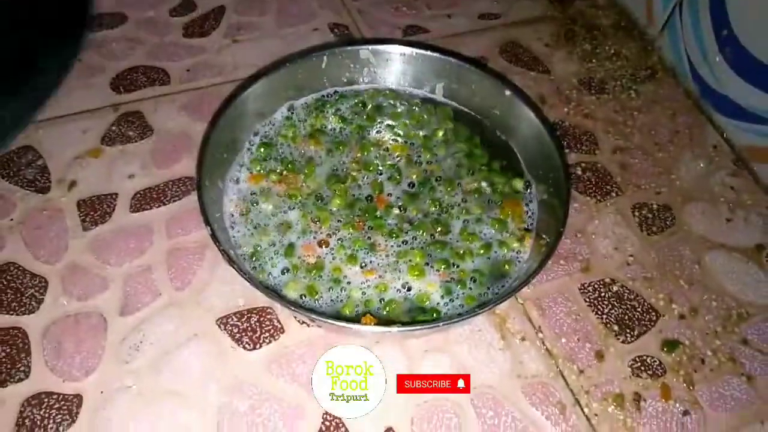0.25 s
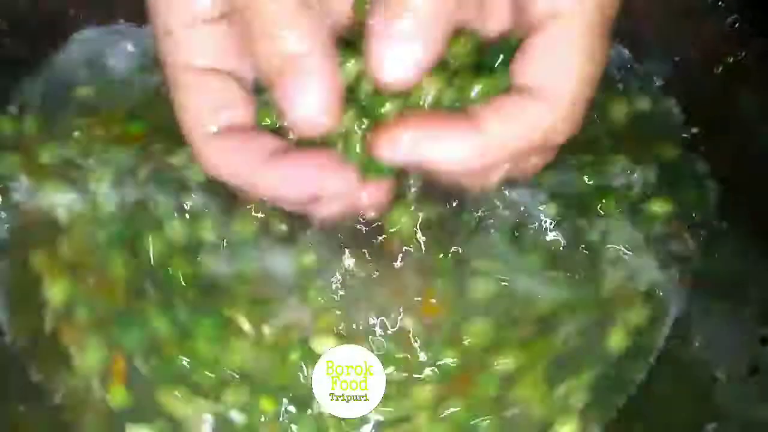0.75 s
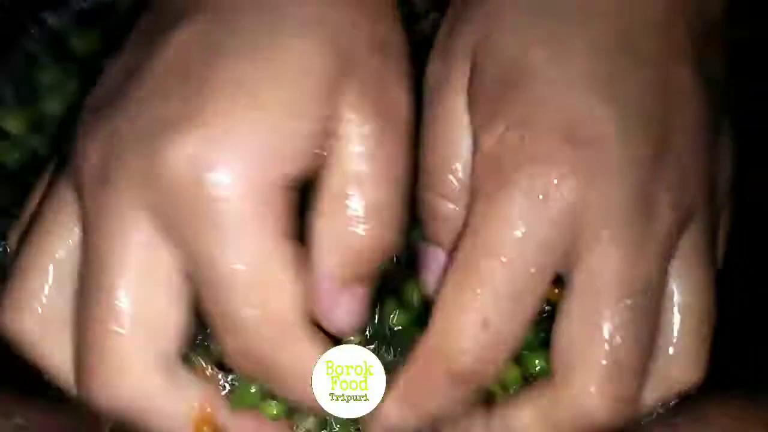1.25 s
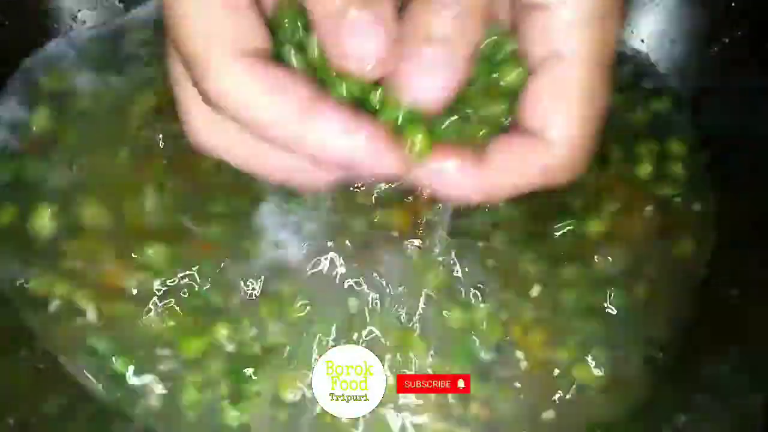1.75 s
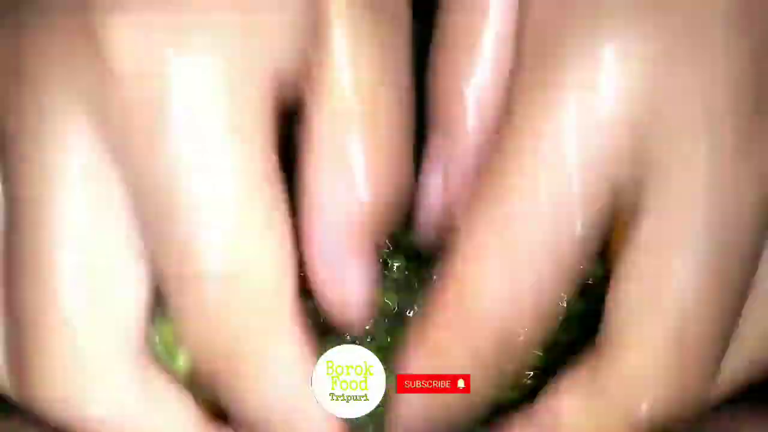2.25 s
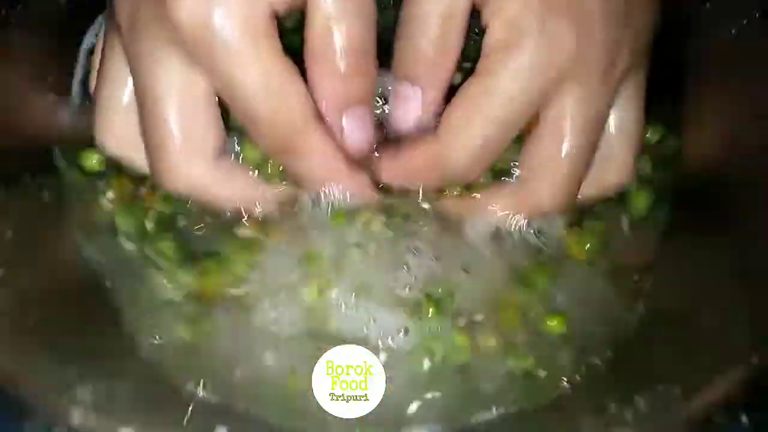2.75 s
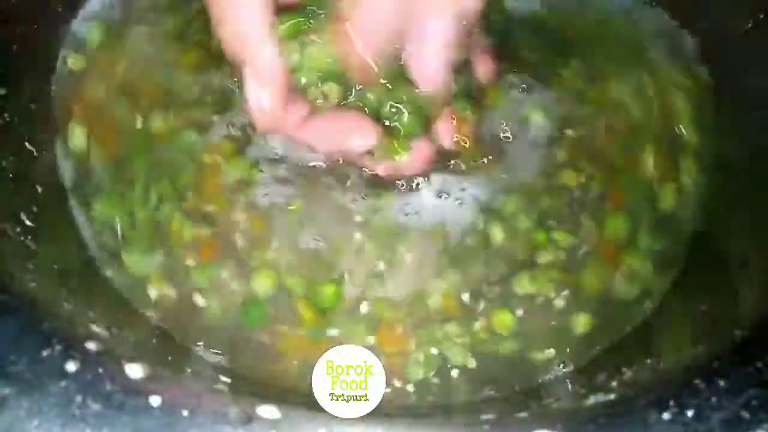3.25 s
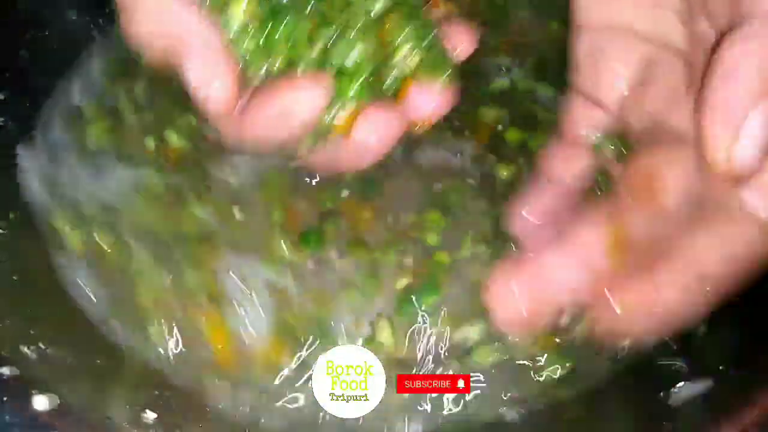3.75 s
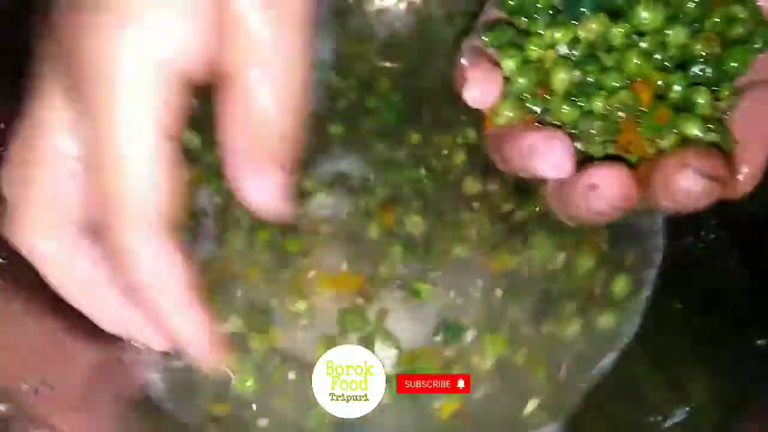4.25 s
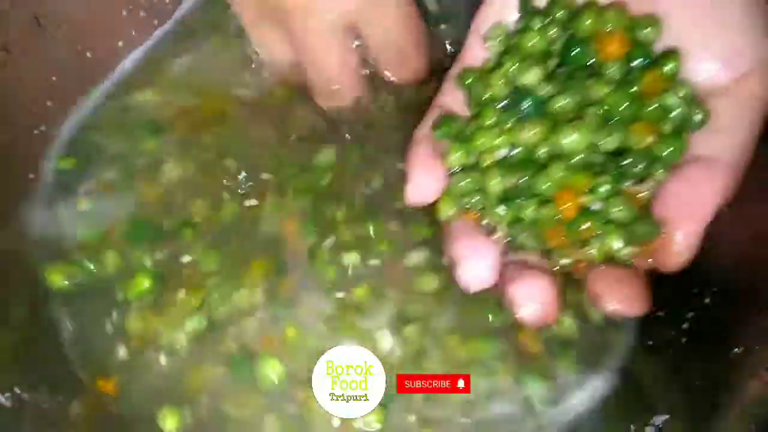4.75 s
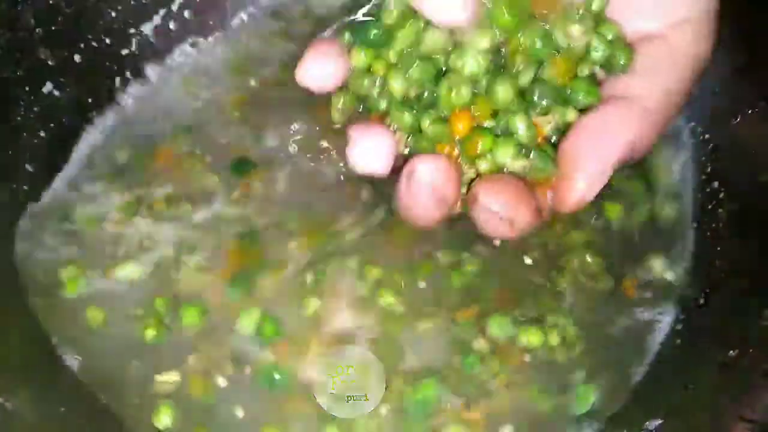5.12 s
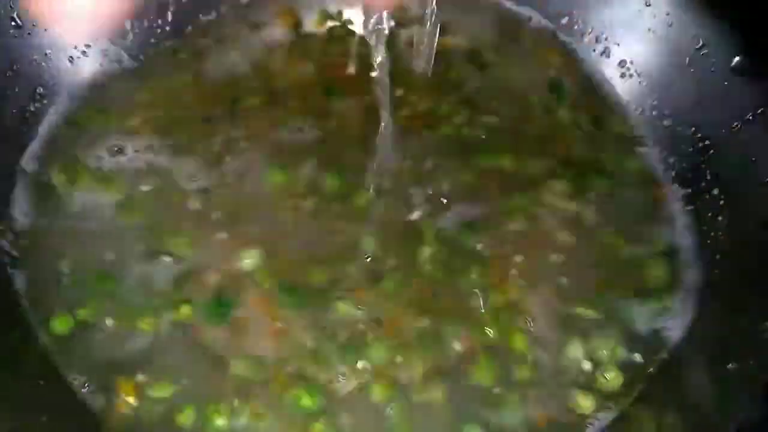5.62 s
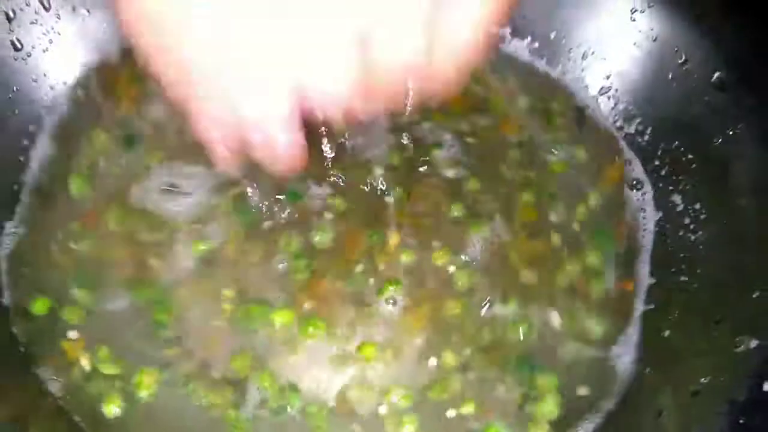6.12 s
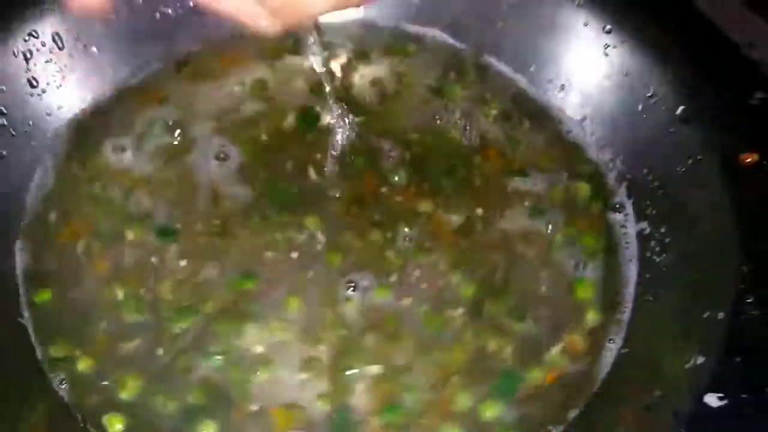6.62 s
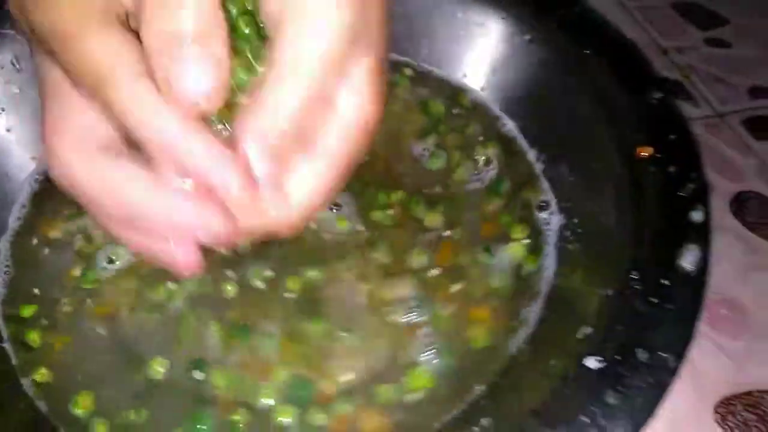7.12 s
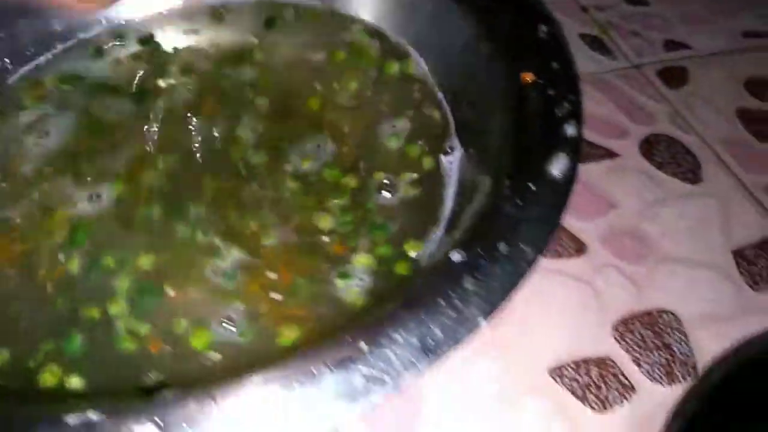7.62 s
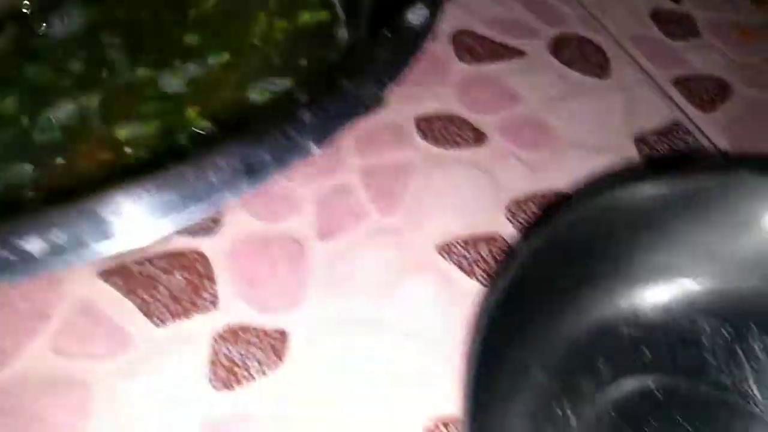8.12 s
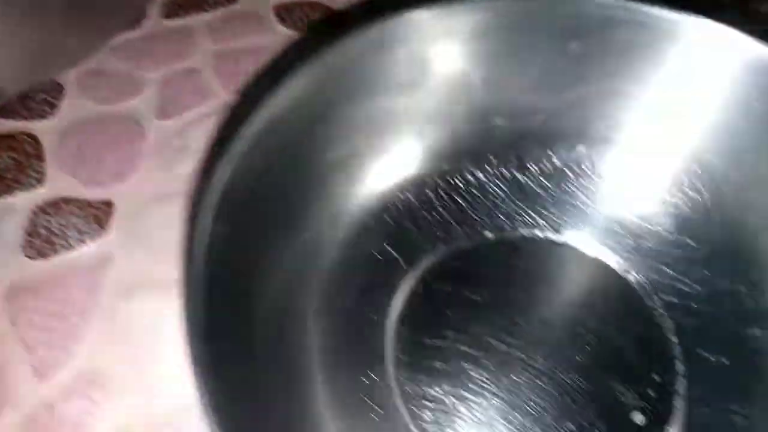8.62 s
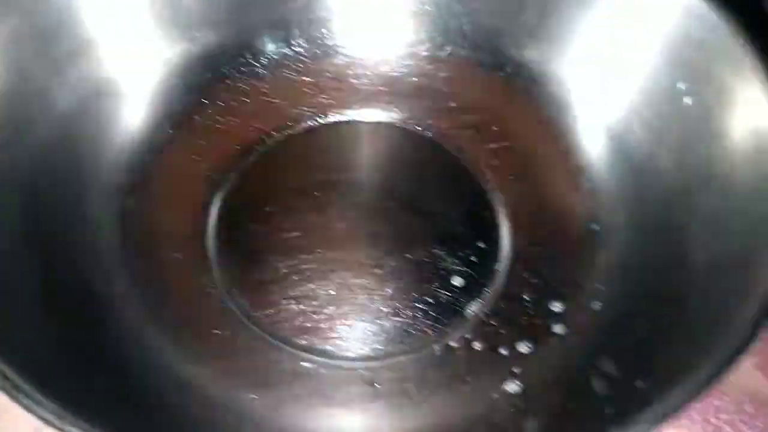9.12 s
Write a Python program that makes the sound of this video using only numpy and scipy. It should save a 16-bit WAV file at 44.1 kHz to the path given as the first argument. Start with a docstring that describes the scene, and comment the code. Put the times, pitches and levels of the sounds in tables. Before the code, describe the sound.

A low wavering hum and faint hiss open with tiny drops and a very brief dropout. Hands then rinse small berries in a steel basin: two fuller gurgling splashes, scattered plinks and drips, two weaker dribbles, and a busy cluster of bright drops. One sharp plop follows, then mostly quiet hum with faint ticks and two tiny distant bird calls. Close phone microphone, small hard kitchen.

```python
"""A low, wavering drone and soft hiss come first, with small drops of water; the sound cuts out briefly near 0.4 s.
Then hands rinse small berries in a steel basin: two long splashes, two weaker ones, and many single drops.
Water is made of short ringing bubbles; drone, hiss and two far bird calls are shaped noise and slow tones.
The steel and the hard kitchen walls ring on. A phone's noise suppressor turns down what stays near the hiss,
and one edit leaves the gap."""
import sys
import numpy as np
from scipy import signal
from scipy.fft import rfft, irfft, next_fast_len
from scipy.io import wavfile
from scipy.ndimage import uniform_filter1d, minimum_filter1d

SR = 44100
rng = np.random.default_rng(int(sys.argv[2]) if len(sys.argv) > 2 else 0)


def to_wav(s):
    """Save 16-bit WAV."""
    ch = np.atleast_2d(s).T  # columns
    pcm = np.round(np.clip(ch, -1, 1) * 32767)  # PCM
    wavfile.write(sys.argv[1], SR, pcm.astype(np.int16))


N = 413658

# Drone levels over time: t/s, lower hum level/dB, upper hum level/dB, rumble level/dB
DRONE_LEVELS = [(0.0, -42, -56, -72), (0.05, -48.5, -83, -62), (0.1, -59.5, -65, -61),
                (0.47, -59.5, -63, -61), (0.6, -49.5, -50.5, -52), (1.07, -65, -68, -58),
                (1.15, -49.5, -47, -50.5), (1.28, -44.5, -61, -53.5), (1.36, -68, -77, -50),
                (1.46, -56, -44, -49.5), (1.62, -51, -67.5, -58), (1.98, -77, -57.5, -63),
                (2.32, -62.5, -69, -56.5), (3.03, -66, -55.5, -59.5), (3.24, -61, -82, -58.5),
                (3.76, -67.5, -59.5, -64), (4.23, -63, -75, -54.5), (4.52, -65.5, -63, -61),
                (5.85, -53, -68.5, -57), (6.03, -48, -61, -52), (6.32, -61, -65, -57), (6.5, -46, -58, -52),
                (7.55, -67.5, -55.5, -54), (8.02, -54.5, -64, -54.5), (8.12, -64.5, -55, -55),
                (9.04, -71.5, -61.5, -56.5), (9.3, -61, -61, -53.5), (9.38, -78, -64, -62)]
# Colour of the noise around the deep hums: f/Hz, relative level per Hz/dB
DEEP_COLOUR = [(13, -41), (22, -11), (38, -11.5), (51, 0.5), (65, 12), (76, 6), (97, -7), (110, -19.5),
               (140, -34.5), (240, -120)]
# Colour of the rumble: f/Hz, relative level per Hz/dB
RUMBLE_COLOUR = [(56, -23.5), (95, 1.5), (103, -7.5), (135, 1.5), (189, -4), (203, -7), (226, -15),
                 (279, -18), (301, -28.5), (330, -26), (361, -37.5), (392, -27.5), (432, -30), (460, -57.5),
                 (500, -33), (650, -41), (1100, -120)]
# Narrow tones that follow the rumble: f/Hz, width/Hz, level against the rumble/dB
RUMBLE_TONES = [(187.5, 6.5, -9), (34.6, 2.9, -11)]
# Narrow tones with levels of their own: f/Hz, width/Hz
FREE_TONES = [(120.6, 3.5), (145.66, 3.2)]
# Their levels over time: t/s, first tone level/dB, second tone level/dB
FREE_TONE_LEVELS = [(0.0, -76, -57), (0.1, -54.5, -62), (0.5, -71.5, -68), (0.68, -54, -60),
                    (1.2, -82, -63), (1.38, -56, -71), (2.45, -70, -60), (2.53, -63, -73),
                    (2.59, -59, -60.5), (3.94, -70.5, -74), (4.18, -55, -65), (5.07, -71, -71.5),
                    (7.34, -64, -61), (8.54, -74, -55), (8.62, -61, -63), (9.38, -80, -51.5)]
# Colour of the room hiss: f/Hz, relative level per Hz/dB
HISS_COLOUR = [(240, -20), (400, -10.5), (774, -7), (930, -11), (1390, -10), (1880, -10.5), (2410, -12),
               (3940, -15), (15700, -21)]
# Far bird calls, before the kitchen's answer: t/s, length/s, middle f/Hz, level/dB
BIRD_CALLS = [(7.71, 0.1, 3696, -64.5), (9.057, 0.053, 3900, -68)]
# How long the kitchen rings: f/Hz, time to fall by 60 dB/s
KITCHEN_DECAY = [(500, 0.068), (2500, 0.26), (6000, 0.3), (14000, 0.2)]
# Ringing tones of the steel basin: f/Hz, width/Hz, gain/dB
BASIN_MODES = [(1218, 1.7, 5.5), (1957, 5.4, -2), (2593, 6.2, 2), (4510, 20, -13)]
# A hand bumps the basin: t/s, level before the knock's shape/dB, f/Hz, rise time/s
BUMPS = [(2.336, -41.5, 361, 0.021), (4.411, -46.5, 211, 0.00025)]
# Thin wavering tones in the water: t/s, length/s, starting f/Hz, glide/Hz per s, level before fades/dB
THIN_TONES = [(1.186, 0.098, 1250, -2, -59.5), (1.88, 0.19, 1312, 0, -62.5), (2.334, .12, 1223, 200, -65),
              (2.384, 0.18, 2420, 3, -69.5), (3.558, 0.1, 2010, 0, -60), (3.564, 0.078, 1248, 0, -66.5),
              (3.703, .14, 2620, -3, -65.5), (4.305, 0.22, 1962, 0, -69.5),
              (4.305, 0.097, 1275, -4.5, -64.5), (5.156, 0.088, 1250, 1.5, -69), (5.281, .1, 1238, -2, -64),
              (5.455, 0.083, 1970, 0, -69), (5.518, 0.11, 2513, 600, -70.5), (5.548, .17, 1246, 3, -64),
              (5.554, .07, 1500, 0, -64.5), (6.375, 0.28, 2632, -600, -62.5),
              (7.038, .23, 2685, -300, -69.5), (7.223, 0.047, 4400, 0, -64)]
# Water pouring off the hands, one list for each pour: t/s, gurgle level/dB
POUR_LEVELS = [
    [(0.9, -75), (0.918, -89), (0.94, -56.5), (1.106, -43), (1.174, -50), (1.186, -50.5), (1.38, -71)],
    [(1.84, -83), (1.846, -81), (1.95, -51), (2.084, -42), (2.214, -63), (2.296, -54.5), (2.42, -85)],
    [(3.97, -93), (3.986, -81), (4.028, -62.5), (4.132, -70), (4.146, -64), (4.216, -99), (4.22, -87)],
    [(4.92, -99), (4.936, -54.5), (5.074, -74.5), (5.106, -61.5), (5.23, -60.5), (5.262, -80.5),
     (5.32, -82)],
]
# Tone filter for the gurgle: f/Hz, relative gain/dB
GURGLE_FILTER = [(400, -59), (800, -21), (1200, -4.5), (2000, 10), (3500, 14.5), (6000, -2), (12000, -43)]
# Tone filter for the fizz: f/Hz, relative gain/dB
FIZZ_FILTER = [(2500, -25), (4000, 0.5), (7000, 1), (9500, -10.5), (12500, -6.5), (15800, -29)]
# Clearly heard drops: t/s, peak level of the bubbles/dB, middle f/Hz, nominal spread of f/Hz
DROP_EVENTS = [(0.023, -47, 3575, 1640), (0.052, -46, 8270, 3800), (0.709, -41, 850, 208),
               (0.726, -56, 4760, 220), (0.779, -44, 3110, 570), (0.785, -46.5, 4710, 220),
               (0.812, -39.5, 4240, 2470), (0.846, -45, 2890, 220), (0.882, -53.5, 6100, 570),
               (0.941, -33.5, 3036, 1170), (0.953, -36, 6470, 3520), (0.971, -41, 1814, 600),
               (1.041, -39, 2610, 791), (1.068, -49, 687, 99), (1.092, -37.5, 1236, 482),
               (1.115, -32, 7160, 3030), (1.182, -34, 2074, 109), (1.224, -38.5, 2386, 40),
               (1.314, -50.5, 3290, 342), (1.381, -49.5, 2290, 222), (1.432, -50.5, 930, 215),
               (1.434, -51.5, 2186, 40), (1.434, -53.5, 3540, 108), (1.755, -59.5, 1830, 40),
               (1.813, -58.5, 1753, 40), (1.848, -52, 3870, 570), (1.893, -48.5, 2950, 1130),
               (1.935, -40, 2540, 1560), (1.964, -37.5, 2385, 40), (1.998, -44.5, 813, 112),
               (2.012, -41, 1955, 225), (2.213, -44, 5770, 1144), (2.22, -57, 1610, 694),
               (2.254, -45.5, 3480, 110), (2.259, -41, 11050, 3440), (2.288, -39.5, 2610, 775),
               (2.301, -52, 1330, 220), (2.315, -44.5, 6170, 220), (2.441, -41, 3600, 3140),
               (2.456, -41, 6540, 3160), (2.575, -41, 1550, 1070), (2.578, -37.5, 3090, 2330),
               (2.891, -52.5, 6520, 2186), (3.033, -56, 6550, 1200), (3.239, -57, 1770, 41),
               (3.271, -54, 1773, 219), (3.307, -48.5, 1788, 40), (3.361, -61, 5730, 300),
               (3.381, -52.5, 2520, 590), (3.427, -56.5, 1770, 110), (3.56, -46.5, 7170, 3220),
               (3.542, -59, 2510, 40), (3.561, -42.5, 2690, 600), (3.642, -55.5, 3360, 497),
               (3.701, -53.5, 2890, 494), (3.905, -51, 4140, 1390), (4.03, -49, 1820, 397),
               (4.101, -49, 4250, 920), (4.142, -51, 1260, 335), (4.144, -52.5, 3360, 444),
               (4.302, -37.5, 7370, 9220), (4.839, -51.5, 2076, 1060), (4.931, -43, 1562, 500),
               (4.938, -40.5, 2490, 2000), (4.974, -45, 6980, 4200), (4.999, -48, 2150, 794),
               (5.06, -56, 2160, 200), (5.09, -46, 9000, 6140), (5.1, -44.5, 1774, 220),
               (5.119, -35, 4050, 2840), (5.154, -63, 2830, 800), (5.166, -44.5, 6940, 2610),
               (5.188, -47.5, 2374, 1660), (5.457, -53.5, 5540, 1352), (5.547, -42.5, 5403, 3320),
               (5.572, -52, 5500, 2980), (5.576, -53.5, 2660, 297), (5.658, -41, 2480, 1450),
               (5.738, -35, 1866, 610), (5.764, -46.5, 2570, 1490), (5.846, -27, 2590, 1300),
               (5.843, -55, 5940, 4970), (5.901, -32, 7380, 8000), (5.918, -38.5, 2730, 110),
               (5.952, -41, 6230, 925), (5.966, -42.5, 1534, 217), (6.001, -39.5, 7550, 7100),
               (6.031, -46.5, 7400, 1587), (6.056, -51.5, 1303, 40), (6.073, -43, 5540, 935),
               (6.172, -47.5, 2910, 810), (6.21, -34.5, 3440, 2000), (6.258, -34.5, 2880, 218),
               (6.26, -44.5, 1790, 560), (6.401, -50, 3760, 890), (6.46, -57.5, 7760, 686),
               (6.729, -35, 5370, 1030), (6.792, -59.5, 1720, 100), (6.806, -52, 11670, 5000),
               (6.997, -58, 1850, 40), (7.044, -26.5, 2676, 219.6), (7.045, -55, 897, 300),
               (7.081, -53, 5900, 351), (8.154, -63, 3695, 40), (8.167, -59.5, 9360, 1495),
               (8.442, -63, 3270, 40), (8.615, -51.5, 1120, 568.5), (8.682, -58, 2740, 886),
               (8.702, -56, 6270, 930), (9.114, -54.5, 1672, 596), (9.357, -61.5, 2600, 40)]
# Level changes of the whole sound, with the edit's gap: t/s, gain/dB
EDIT_GAIN = [(0, -0.5), (.392, -1), (.396, -90), (.419, -65), (.423, -8.5), (.5, -1), (9.4, -1.5)]

HUM_HZ, HUM_DRIFT_HZ = (66.5, 79.6), 1.39  # middle pitches; rms drift around them
HISS_DB = -70
WHISTLE_WIDTH_HZ, WHISTLE_RISE_S, WHISTLE_FALL_S = 46, 0.006, 0.093
FULL_FLOW_DB = -45.5  # gurgle level of a full sheet of water
# Levels against the gurgle at full flow; each "grows" is dB per dB of flow
FIZZ_DB, FIZZ_GROWS, SLOSH_DB, SLOSH_GROWS = -9, 0.68, -8, 2.27
# dB of bubble rate and of fizz lost for each dB that a pour peaks under full flow
SMALL_POUR_THINS, SMALL_POUR_DULLS = 0.8, 0.4
BUBBLES_PER_DROP = 16
SLAP_DB, SLAP_HZ, SLAP_SPREAD_HZ = -15, 5600, 3800  # bright slap, level against the drop
DROPLETS = 2  # thrown up by each drop
DROPLET_DB, DROPLET_SCATTER_DB = -17, 16  # strongest against the drop; random loss up to the scatter
FLIGHT_S = 0.074  # flights last 0.2 to 1.2 times this
DROPLET_OCTAVES, DROPLET_SPREAD = 0.578, 0.57  # whole pitch range; share of the drop's spread
TOP_HZ = 15600


def amp(db):
    """Turn dB into a gain."""
    return 10 ** (np.asarray(db) / 20)


def unit(x):
    """Scale x to an rms level of 1."""
    return x / np.sqrt(np.mean(x ** 2) + 1e-20)


def along(points, hz):
    """Read a curve of (Hz, value) points on a log frequency axis."""
    f, v = np.transpose(points)
    return np.interp(np.log(hz + 1), np.log(f + 1), v)


def curves(rows):
    """Give one dB value per sample for each column after the time; -140 dB outside the rows."""
    s, *cols = np.transpose(rows)
    t = np.arange(N) / SR
    return [np.interp(t, s, c, -140, -140) for c in cols]


def filtered(x, response):
    """Change the strength of each frequency in x by a response curve."""
    m = next_fast_len(x.shape[-1] + 8192)  # spare room for ringing
    spectrum = rfft(x, m) * response(np.fft.rfftfreq(m, 1 / SR))
    return irfft(spectrum, m)[..., :x.shape[-1]]


def noise(colour):
    """Make coloured noise of rms 1."""
    return unit(filtered(rng.standard_normal(N), lambda hz: amp(along(colour, hz))))


def narrow(hz, width_hz):
    """Make a wavering tone: noise of rms 1 in a thin band."""
    return unit(filtered(rng.standard_normal(N), lambda f: 1 / (1 + (2 * (f - hz) / width_hz) ** 2)))


def room_hiss():
    """Steady noise with the colour of the room."""
    return amp(HISS_DB) * noise(HISS_COLOUR)


def hum(hz):
    """A deep sine whose pitch and strength waver slowly and at random."""
    slow = [(.5, -3.5), (6, -1.5), (14, -28), (30, -77.5)]  # speed of wavering/Hz, relative level per Hz/dB
    strength = amp(2.0 * noise(slow))
    pitch = hz + HUM_DRIFT_HZ * noise(slow)
    return np.sqrt(2) * strength * np.sin(2 * np.pi * np.cumsum(pitch) / SR)


def drone():
    """Two wavering hums with deep noise, a band of rumble and narrow tones that come and go."""
    low_db, high_db, rumble_db = curves(DRONE_LEVELS)
    deep = amp(low_db) * (hum(HUM_HZ[0]) + 0.59 * noise(DEEP_COLOUR))
    deep += amp(high_db) * (hum(HUM_HZ[1]) + 0.58 * noise(DEEP_COLOUR))
    rumble = amp(-1.0) * noise(RUMBLE_COLOUR)
    rumble += sum(amp(db) * narrow(hz, width_hz) for hz, width_hz, db in RUMBLE_TONES)
    free = sum(amp(db) * narrow(*tone) for tone, db in zip(FREE_TONES, curves(FREE_TONE_LEVELS)))
    return deep + amp(rumble_db) * rumble + free


def bird():
    """Short buzzy calls: a band of noise, blurred by distance."""
    out, t = np.zeros(N), np.arange(N) / SR
    for s, length, hz, db in BIRD_CALLS:
        swell = np.sin(np.pi * np.clip((t - s) / length, 0, 1)) ** 0.11
        band = noise([(hz - 900, -60), (hz - 450, -6), (hz, 0), (hz + 350, -6), (hz + 800, -60)])
        out += amp(db) * swell * band
    return out


def kitchen(x):
    """Hard walls answer with a fading noise tail; each quarter second of sound meets a new one."""
    step, out = SR // 4, np.zeros(N + 2 * SR)
    for k in range(0, N, step):
        hz, t, z = signal.stft(rng.standard_normal(SR // 2), SR, nperseg=256)
        fade = amp(-60 * t / along(KITCHEN_DECAY, hz)[:, None])
        tail = signal.istft(z * fade, SR, nperseg=256)[1]
        wet = signal.fftconvolve(x[k:k + step], tail / np.linalg.norm(tail))
        out[k + 120:][:len(wet)] += wet  # the answer starts 120 samples late
    return out[:N]


def basin(x):
    """The steel walls take up a little of every splash and ring on at their own pitches."""
    def resonances(f):
        return sum(amp(db) * 1j * f * w / (c * c - f * f + 1j * f * w) for c, w, db in BASIN_MODES)
    return filtered(x, resonances)


def thumps():
    """Dull knocks on the basin's wall: a soft or a hard start, then a short ring."""
    out, t = np.zeros(N + SR), np.arange(SR // 5) / SR
    for s, db, hz, rise in BUMPS:
        fade = np.exp(-t / 0.023) + 2.3 * np.exp(-t / 0.00086)
        knock = fade * (1 - np.exp(-t / rise)) * np.sin(2 * np.pi * hz * t)
        out[round(s * SR):][:len(t)] += amp(db) * knock
    return out[:N]


def whistles():
    """Thin tones that start quickly, waver, glide or hold their pitch, and fade."""
    out = np.zeros(N + SR)
    for s, length, hz, glide, db in THIN_TONES:
        t = np.arange(round(length * SR)) / SR
        slow = filtered(rng.standard_normal((2, SR // 2)), lambda f: 1 / (1 + (2 * f / WHISTLE_WIDTH_HZ) ** 2))
        a, b = unit(slow)[:, :len(t)]
        turn = 2 * np.pi * (hz + glide * t / 2) * t
        tone = a * np.cos(turn) + b * np.sin(turn)  # two slow noises make the tone waver
        shape = np.clip(t / WHISTLE_RISE_S, 0, 1) * np.clip((length - t) / WHISTLE_FALL_S, 0, 1)
        out[round(s * SR):][:len(t)] += amp(db) * shape * tone
    return out[:N]


def bubbles(count, t0, t1, low_hz, high_hz, cycles, spread_db):
    """Random bubbles ring as fading sines of rising pitch, most near the weakest level; rms 1 over their span."""
    u = rng.random((count, 3))  # random time, pitch and strength
    hz = (low_hz * (high_hz / low_hz) ** u[:, 1])[:, None]
    t = np.arange(SR // 40) / SR
    turn = hz * t  # cycles so far
    shape = np.exp(-turn / cycles) * (1 - np.exp(-turn / 1.5))
    ring = np.sin(2 * np.pi * turn * (1 + .025 * turn / cycles))
    wave = amp(spread_db * u[:, 2:] ** 2) * shape * ring
    at = ((t0 + (t1 - t0) * u[:, :1]) * SR).astype(int) + np.arange(len(t))
    out = np.bincount(at.ravel(), wave.ravel(), N + SR)[:N]
    return out / np.sqrt(np.sum(out ** 2) / ((t1 - t0) * SR))


def pours():
    """Sheets of water fall back: many bubbles and fine crackle, with a hollow slosh when the flow is full."""
    out = np.zeros(N)
    for rows in POUR_LEVELS:
        gurgle_db, = curves(rows)
        flow_db = gurgle_db - FULL_FLOW_DB
        t0, t1 = rows[0][0], rows[-1][0]
        size_db = min(flow_db.max(), 0)
        many = (t1 - t0) * amp(SMALL_POUR_THINS * size_db)  # seconds' worth of full flow
        span_gain = np.sqrt((t1 - t0) * SR / N)  # makes rms 1 hold over the pour alone
        plops = bubbles(count=int(1400 * many), t0=t0, t1=t1, low_hz=595.0, high_hz=5780,
                        cycles=16.5, spread_db=15)
        gurgle = unit(filtered(plops, lambda hz: amp(along(GURGLE_FILTER, hz)))) * span_gain
        crackle = bubbles(count=int(1800 * many), t0=t0, t1=t1, low_hz=4144, high_hz=14900,
                          cycles=7.8, spread_db=34.5)
        fizz = unit(filtered(crackle, lambda hz: amp(along(FIZZ_FILTER, hz)))) * span_gain
        slosh = bubbles(count=160, t0=t0, t1=t1, low_hz=591, high_hz=1234, cycles=7.3, spread_db=4)
        fizz_db = FULL_FLOW_DB + FIZZ_DB + FIZZ_GROWS * flow_db + SMALL_POUR_DULLS * size_db
        slosh_db = FULL_FLOW_DB + SLOSH_DB + SLOSH_GROWS * flow_db
        out += amp(gurgle_db) * gurgle + amp(fizz_db) * fizz + amp(slosh_db) * slosh
    return out


def splash(hz, spread_hz):
    """A drop traps a swarm of bubbles, most within milliseconds; a wide spread of sizes dies fast, like a slap."""
    t = np.arange(SR // 7) / SR
    u = rng.random((BUBBLES_PER_DROP, 3))
    slot = (np.arange(BUBBLES_PER_DROP)[:, None] + u[:, :1]) / BUBBLES_PER_DROP - .5
    pitch = np.clip(hz + 1.168 * spread_hz * slot, 300, 16000)
    late = u[:, 1:2] > .75  # some bubbles surface after the slap, weaker and clearer
    life = 1 / (pitch / 14 + ~late * spread_hz / 9)  # larger bubbles are lower and ring longer
    start = np.where(late, .3 * (u[:, 1:2] - .75) + 0.0072, .009 * u[:, 1:2] ** 2)
    age = np.clip(t - start, 0, None)
    shape = np.exp(-age / life) * (1 - np.exp(-age / 0.00051)) ** 2
    ring = shape * np.sin(2 * np.pi * pitch * age * (1 + 0.0092 * age / life))  # pitch rises slightly
    level_db = 12.2 * u[:, 2:] - 16.7 * late - 14.7 * slot ** 2
    swarm = np.sum(amp(level_db) * ring, axis=0)
    tick = np.exp(-t / 0.0018) * np.diff(rng.standard_normal(len(t) + 1))  # first touch on the surface
    return swarm / abs(swarm).max() + amp(-27) * tick


def drops():
    """Every drop slaps the surface and throws up droplets that fall back a moment later."""
    out = np.zeros(N + SR)
    for s, db, hz, spread_hz in DROP_EVENTS:
        falls = [(s, db, hz, spread_hz), (s, db + SLAP_DB, SLAP_HZ, SLAP_SPREAD_HZ)]
        for late, weak, size in rng.random((DROPLETS, 3)):
            landing = s + FLIGHT_S * (.2 + late)
            droplet_db = db + DROPLET_DB - DROPLET_SCATTER_DB * weak
            droplet_hz = hz * 2 ** (DROPLET_OCTAVES * (size - .5))
            falls.append((landing, droplet_db, droplet_hz, DROPLET_SPREAD * spread_hz))
        for at, peak_db, pitch, spread in falls:
            sound = splash(pitch, spread)
            out[round(at * SR):][:len(sound)] += amp(peak_db) * sound
    return out[:N]


def scene():
    """Water and bird sound in the kitchen, with knocks, over drone and hiss."""
    water = drops() + pours()
    water = water + basin(water) + whistles()
    call = bird()
    wet = kitchen(amp(-3) * water + amp(5) * call)
    return (water + call + wet + thumps() + drone() + room_hiss())[None]


def suppressor(x, depth_db, margin_db):
    """Bands near their usual level are turned down; those well over it open, stay open a moment, then shut."""
    hz, _, z = signal.stft(x, SR, nperseg=512, noverlap=384)
    power = uniform_filter1d(abs(z) ** 2, size=3, axis=1)  # smooth across bands
    power = uniform_filter1d(power, size=7, axis=2)  # smooth over time
    usual = np.percentile(power, 30, axis=2, keepdims=True)
    opening = np.clip(1 - amp(2 * margin_db) * usual / (abs(power) + 1e-20), 0, 1)
    held = -minimum_filter1d(-opening, size=15, axis=2, origin=7)  # largest recent opening
    gain = np.clip(uniform_filter1d(held, size=3, axis=2), amp(-depth_db), 1)
    gain[:, hz < 480] = 1  # the bass is left alone
    return signal.istft(z * gain, SR, nperseg=512, noverlap=384)[1][:, :N]


def record(dry):
    """Apply the noise suppressor, then the edit's gap, then cut everything from TOP_HZ up."""
    cleaned = suppressor(dry, depth_db=6.5, margin_db=7.5)
    edited = cleaned * amp(curves(EDIT_GAIN)[0])
    return filtered(edited, lambda hz: hz < TOP_HZ)


dry = scene()
out = record(dry)
to_wav(out)
```